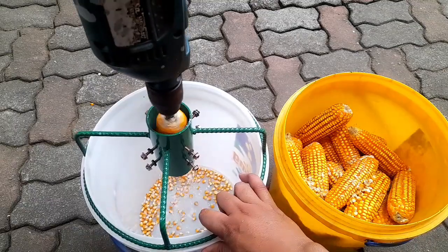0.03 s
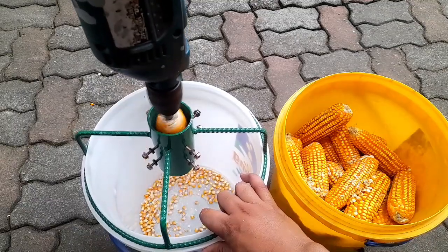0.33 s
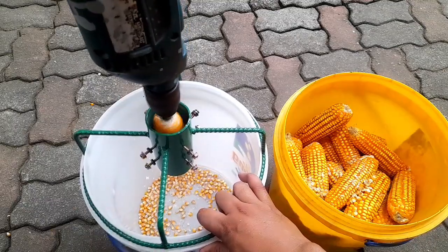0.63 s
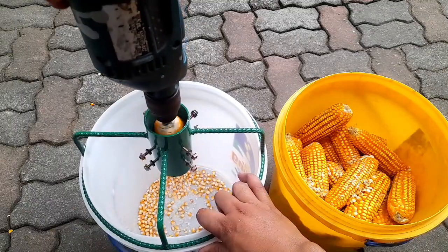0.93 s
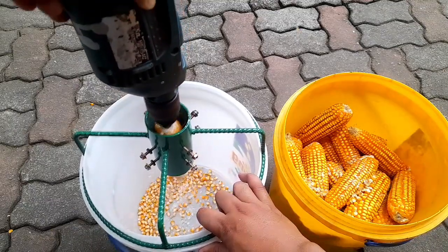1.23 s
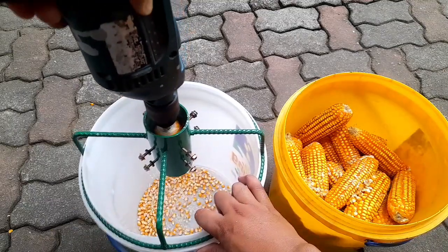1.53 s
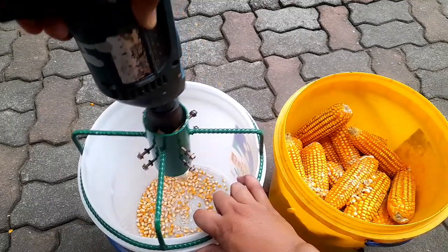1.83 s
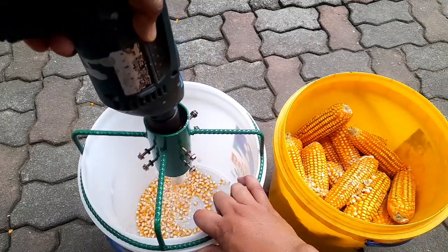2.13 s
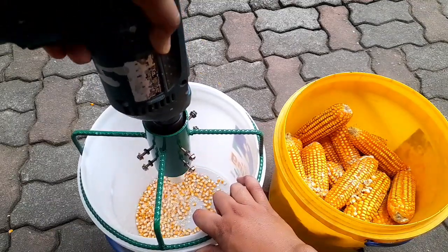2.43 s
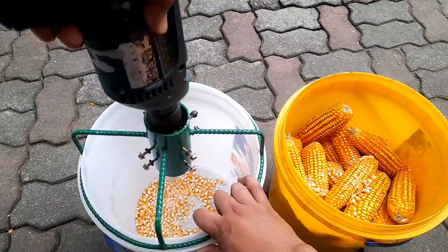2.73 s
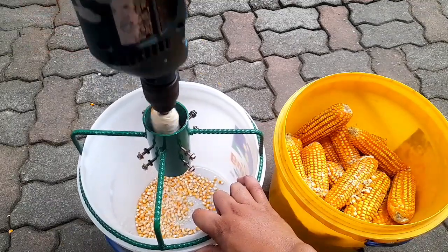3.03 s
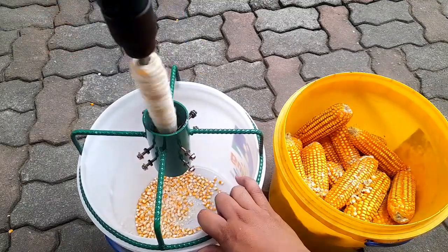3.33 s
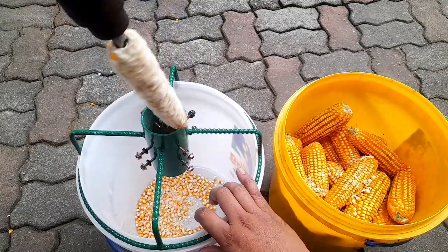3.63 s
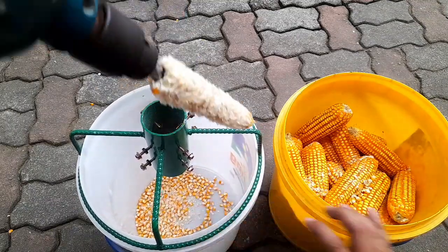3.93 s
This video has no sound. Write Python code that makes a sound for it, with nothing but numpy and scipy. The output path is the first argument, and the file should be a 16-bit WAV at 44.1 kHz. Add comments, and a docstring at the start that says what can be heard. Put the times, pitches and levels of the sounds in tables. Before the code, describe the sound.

A corn cob spun by a power drill grinds roughly in a steel pipe, close by outdoors. Kernels snap off and drum into a plastic bucket amid hollow knocks. Then the cob scrapes out and the drill winds down.

```python
"""Shelling corn with a power drill

Outdoors, a drill spins a corn cob through a toothed steel pipe over a plastic bucket. The teeth grind
and snap the kernels off, they drum into the bucket, and the cob judders with hollow knocks. After three
seconds the bare cob is drawn out, scraping and bumping, and the drill runs down with a falling whine.
Two microphones stand close by, the left one a little nearer the pipe."""
import sys
import numpy as np
from scipy import signal
from scipy.fft import rfft, irfft
from scipy.io import wavfile

SR = 44100
rng = np.random.default_rng(int(sys.argv[2]) if len(sys.argv) > 2 else 0)


def to_wav(sig):
    """Store sig (one row per channel, or 1-D mono) as 16-bit WAV at the path in sys.argv[1].

    Samples outside -1..1 are clipped; the rate is SR.
    """
    pcm = np.clip(np.atleast_2d(sig), -1, 1) * 32767
    pcm = np.round(pcm).astype(np.int16)
    wavfile.write(sys.argv[1], SR, pcm.T)  # frames by channels


N = 176400
T = np.arange(N) / SR
GRIND_END_S, USUAL_LOAD_DB = 3.154, -37

# How hard the cob is pressed into the teeth: time_s, load_db
COB_LOAD = [(0.0, -36.5), (0.08, -33.5), (0.18, -40), (0.38, -38), (0.45, -29), (0.59, -34), (0.64, -31.5),
            (0.84, -38), (0.91, -32.5), (0.93, -39), (1.16, -34), (1.66, -36.5), (1.81, -31.5), (1.92, -32),
            (2.11, -39), (2.46, -35), (2.66, -36.5), (2.81, -32.5), (3.2, -42.5)]
def cob_pressure(turns_per_s=9.6, wander=0.18):
    """The lopsided cob presses harder once in every uneven turn, on top of the slower load."""
    drift = np.interp(T, np.linspace(0, T[-1], 30), rng.standard_normal(30))
    turn = np.sin(2 * np.pi * np.cumsum(turns_per_s * (1 + wander * drift)) / SR)
    return turn, np.interp(T, *np.transpose(COB_LOAD))


# Resonances of the steel pipe: frequency_hz, gain_db
PIPE_SPECTRUM = [(440, -41), (750, -9), (857, -16.5), (947, -16), (1020, -8), (1120, -9), (1370, -10),
                 (1670, -3), (1850, -3), (1990, 1.5), (2180, -5), (2730, -3.5), (3120, -6), (3420, -13),
                 (3910, -9), (4730, -14), (5500, -23), (7150, -23.5), (12100, -120)]
# Dry kernels rubbing together: frequency_hz, gain_db
CRACKLE_SPECTRUM = [(2820, -20), (4800, -2), (5730, -6.5), (8060, -2.5), (10000, -5), (14600, -7),
                    (15500, -9), (16000, -14.5)]
def grinding(turn, load_db):
    """Teeth rasp over the kernels and ring the pipe; dry kernels crackle against each other."""
    rasp = colour(grains(per_s=1400, spread_db=1, decay_s=0.00065), PIPE_SPECTRUM)
    crackle = colour(grains(per_s=1100, spread_db=3, decay_s=0.0006), CRACKLE_SPECTRUM)
    rasp_db = load_db + 2.5 + 1.15 * turn
    crackle_db = -38.5 + 0.8 * (load_db - USUAL_LOAD_DB) + 0.2 * turn
    return fade(GRIND_END_S, db_per_s=57) * (rasp * amp(rasp_db) + crackle * amp(crackle_db))


# Kernels snapping off: start_s, level_db
SNAPS = [(0.1005, -20.5), (0.1437, -20), (0.176, -17.5), (0.1925, -20), (0.2058, -18), (0.223, -19),
         (0.2431, -16), (0.267, -16.5), (0.349, -18.5), (0.373, -17.5), (1.044, -25), (1.0844, -19.5),
         (1.106, -20.5), (1.1283, -20), (1.1472, -21), (1.1654, -18.5), (1.1847, -20.5), (1.298, -22.5),
         (1.376, -23.5), (1.4115, -25), (1.717, -20.5), (1.7655, -22), (2.167, -21.5), (2.2659, -20.5),
         (2.568, -27)]
# Their bright crack, close up: frequency_hz, gain_db
SNAP_SPECTRUM = [(300, -53), (1200, -6.5), (2300, 0), (5000, -1.5), (8500, -2.5), (12000, -4.5),
                 (16000, -7.5)]
def snaps(lag_s=0.0019):
    """Single kernels break away with a sharp crack."""
    events = [(start_s + lag_s, level_db) for start_s, level_db in SNAPS]
    return colour(bursts(events, rise_s=0.0001, decay_s=0.0016, tail_db=-6), SNAP_SPECTRUM)


# The plastic bucket under the pipe: frequency_hz, gain_db
BUCKET_SPECTRUM = [(40, -61), (70, -30), (128, -15), (256, -9.5), (296, -1.5), (371, -7.5), (423, -7),
                   (477, -1), (510, -2.5), (544, -10), (605, -10), (748, -14), (843, -21), (950, -20),
                   (1240, -38), (2090, -120)]
def pour(turn, load_db, thins_s=2.0, end_s=3.01):
    """A stream of kernels drums on the bucket and thins out as the cob leaves."""
    drops = unit(impacts(per_s=640, spread_db=1.5) * rng.choice([-1, 1], N))
    level_db = -37 + 0.76 * (load_db - USUAL_LOAD_DB) + 2.5 * turn
    level_db -= 1.5 * (T > thins_s)  # fewer kernels are left on the cob
    drops *= amp(level_db) * fade(end_s, db_per_s=35)
    wall = drops * rng.standard_normal(N) * amp(-15)  # opposite in sign at the two microphones
    return colour(np.array([drops + wall, drops - wall]), BUCKET_SPECTRUM)


# Hollow knocks of the juddering cob: time_s, level_db
KNOCKS = [(0.1, -16), (0.432, -12.5), (0.489, -14), (0.556, -13.5), (0.687, -14), (0.734, -17.5),
          (0.912, -14), (0.973, -17.5), (1.282, -11.5), (1.426, -18), (1.487, -13.5), (1.603, -16),
          (1.698, -16.5), (1.749, -17), (1.833, -13), (1.892, -17), (1.966, -16), (2.137, -21),
          (2.239, -19), (2.305, -17), (2.473, -6.5), (2.537, -19), (2.599, -17.5), (2.679, -15),
          (2.745, -18.5), (2.914, -26), (2.973, -17)]
# The modes each knock rings: pitch_hz, level_db, t60_s
KNOCK_MODES = [(294, -19, 0.041), (358, -15, 0.067), (425, -26, 0.11), (477.5, 2, 0.062), (701, -11, 0.048)]
def knocks(swell_s=0.0084, lead_s=0.00318, detune=0.022, gain_db=-1.5):
    """Hollow knocks swell briefly and ring near 480 Hz as the cob sticks and slips."""
    out, t = np.zeros((2, N)), np.arange(SR // 5) / SR
    swell = 1 - np.exp(-(t / swell_s) ** 2)
    for time_s, level_db in KNOCKS:
        ring = np.zeros_like(t)
        for pitch_hz, mode_db, t60_s in KNOCK_MODES:
            stray_db, stray_pitch, phase = rng.standard_normal(3)
            cycles = pitch_hz * (1 + detune * stray_pitch) * t + phase
            ring += amp(mode_db + stray_db - 60 * t / t60_s) * np.sin(2 * np.pi * cycles)
        add(out, time_s - lead_s, amp(level_db + gain_db) * swell * ring)
    return out


# The bare cob brushing the pipe: frequency_hz, gain_db
BRUSH_SPECTRUM = [(470, -39), (800, -25), (963, 0.5), (1140, -18), (1630, 7), (1810, 2), (1940, -6),
                  (3200, -6), (4160, -46), (7040, -120)]
# The cob catching on the teeth: start_s, level_db
CATCHES = [(1.8305, -16), (2.796, -13.5), (3.0168, -15), (3.0787, -28), (3.134, -20.5), (3.223, -23),
           (3.2707, -25), (3.2785, -19), (3.3086, -31), (3.3455, -24), (3.3634, -23), (3.5052, -20),
           (3.522, -27), (3.954, -39.5)]
# The scrape of each catch: frequency_hz, gain_db
SCRAPE_SPECTRUM = [(200, -22), (800, -4), (1700, 10), (3200, 2), (4500, 1), (7000, 1), (16000, -19)]
def cob_scrapes(free_s=3.49):
    """The cob catches on the teeth, mostly on its way out, when it brushes the pipe and comes free."""
    level = amp(-47.5) * unloading(over_s=0.12) * fade(free_s, db_per_s=155)
    brush = colour(grains(per_s=1700, spread_db=5, decay_s=0.00058), BRUSH_SPECTRUM)
    catches = colour(bursts(CATCHES, rise_s=0.00025, decay_s=0.0031, tail_db=-1.5), SCRAPE_SPECTRUM)
    return level * brush + amp(-9.5) * catches


# Hard kernels hitting the pipe: start_s, pitch_hz, level_db
PINGS = [(0.55, 4150, -27), (0.628, 2060, -23), (1.0234, 3720, -31), (2.5694, 4040, -26),
         (2.742, 4720, -24.5)]
def pings(rise_s=0.00067, decay_s=0.0067):
    """A kernel flung against the steel leaves a brief ring, in a different phase at each microphone."""
    out, t = np.zeros((2, N)), np.arange(SR // 10) / SR
    ring = (1 - np.exp(-t / rise_s)) * np.exp(-t / decay_s)
    for start_s, pitch_hz, level_db in PINGS:
        cycles = pitch_hz * t + 0.5 * rng.random((2, 1))
        add(out, start_s, amp(level_db) * ring * np.sin(2 * np.pi * cycles))
    return out


# The cob binding in the pipe: start_s, length_s, pitch_hz, level_db
GROANS = [(1.768, 0.12, 217, -38.5), (2.782, .1, 397.6, -34)]
def groans(sag_per_s=1.27):
    """The cob binds and judders, its pitch sagging as it drags on the drill."""
    out = np.zeros((2, N))
    for start_s, length_s, pitch_hz, level_db in GROANS:
        t = np.arange(0, length_s, 1 / SR)
        cycles = np.cumsum(pitch_hz * np.exp(-sag_per_s * t)) / SR
        add(out, start_s, amp(level_db) * np.sin(np.pi * t / length_s) * np.sin(2 * np.pi * cycles))
    return out * flutter(width_hz=84)


# Bumps on the bucket's rim: start_s, level_db
JOLTS = [(0.056, -39), (0.457, -35), (0.902, -40), (2.37, -29.5), (2.68, -29), (3.216, -35), (3.589, -37),
         (3.636, -43)]
# Their low thud: frequency_hz, gain_db
THUD_SPECTRUM = [(30, -56), (70, -30), (120, -9), (175, -9), (235, 3), (310, -7), (500, -22), (3000, -70)]
def jolts():
    """The cob jolts the frame, which thuds dully on the bucket."""
    return amp(1.5) * colour(bursts(JOLTS, rise_s=0.0028, decay_s=0.016, tail_db=-6.5), THUD_SPECTRUM)


# The drill's brushes and gears: frequency_hz, gain_db
MOTOR_SPECTRUM = [(500, -27), (1000, -5.5), (1300, -5.5), (2400, -4.5), (3000, -8), (4100, -8), (4550, 2),
                  (5100, -7), (6600, -3.5), (10000, -7.5), (13000, -8.5), (16000, -18)]
def motor(slows_s=3.674, loaded_db=-7.5):
    """The drill fizzes, louder once it runs free; fizz and whine die away as it stops."""
    level_db = -41.5 + loaded_db * (1 - unloading(over_s=0.099))
    fizz = colour(grains(per_s=2300, spread_db=4.5, decay_s=0.0002), MOTOR_SPECTRUM)
    return fade(slows_s, db_per_s=90) * (amp(level_db) * fizz + whine())


# Partials of the motor's whine: harmonic, level_db
WHINE_PARTIALS = [(2, -52), (3, -58)]
def whine(coast_s=3.5, fundamental_hz=2500, spin_down_s=0.358):
    """The released motor coasts down with a falling whine."""
    since_s = np.maximum(T - coast_s, 0)
    cycles = np.cumsum(fundamental_hz * np.exp(-since_s / spin_down_s)) / SR
    level = np.minimum(since_s / 0.1, 1) * fade(coast_s, db_per_s=62)
    return level * sum(amp(level_db) * flutter(width_hz=160) * np.sin(2 * np.pi * harmonic * cycles)
                       for harmonic, level_db in WHINE_PARTIALS)


# The open air, heard beside the bucket: frequency_hz, gain_db
BACKGROUND_SPECTRUM = [(30, -62), (136, -10.5), (253, -11.5), (292, -1.5), (320, -17.5), (364, -6),
                       (394, -13), (511, -9), (567, -17), (6530, -38.5), (15000, -52)]
def background():
    """Faint outdoor background with the bucket's low, hollow resonance."""
    return amp(-54) * colour(noise_pair(), BACKGROUND_SPECTRUM)


def amp(db):
    """Decibels to gain."""
    return 10 ** (np.asarray(db) / 20)


def unit(x):
    """Scales to an rms of 1."""
    return x / np.sqrt(np.mean(x ** 2) + 1e-20)


def fade(start_s, db_per_s):
    """A gain of 1 that dies away from start_s on."""
    return amp(-db_per_s * np.maximum(T - start_s, 0))


def unloading(over_s):
    """Rises from 0 to 1 over the last moments of grinding."""
    return np.clip((T - GRIND_END_S) / over_s + 1, 0, 1)


def flutter(width_hz, depth=0.76):
    """A gain that wavers at random around 1."""
    return 1 + depth * unit(smear(smear(rng.standard_normal(N), 1 / width_hz), 1 / width_hz))


def add(mix, start_s, sound):
    """Mixes a sound in at start_s."""
    part = mix[:, max(round(start_s * SR), 0):][:, :sound.shape[-1]]
    part += sound[..., :part.shape[1]]


def colour(x, spectrum):
    """Causal filter of unit energy with the given spectral shape."""
    hz, db = np.transpose(spectrum)
    bins_hz = abs(np.fft.fftfreq(4096, 1 / SR))
    gain_db = np.maximum(np.interp(np.log(bins_hz + 1), np.log(hz + 1), db), -100)
    minimum_phase = np.exp(np.conj(signal.hilbert(np.log(amp(gain_db)))))
    taps = np.fft.ifft(minimum_phase).real
    return signal.oaconvolve(x, taps[None] / np.linalg.norm(taps), axes=1)[:, :x.shape[1]]


def impacts(per_s, spread_db):
    """Random impacts, many small and a few large."""
    return (rng.random(N) < per_s / SR) * amp(spread_db * np.minimum(rng.exponential(1, N), 4.5))


def grains(per_s, spread_db, decay_s):
    """Each impact is a tiny burst that swells and dies within a few decay_s."""
    power = smear(smear(impacts(per_s, spread_db) ** 2, decay_s), decay_s)
    return unit(scattered(power, tail_db=-1.5))


def bursts(events, rise_s, decay_s, tail_db):
    """One decaying burst of noise for each event."""
    level, t = np.zeros((1, N)), np.arange(SR // 5) / SR
    for start_s, level_db in events:
        add(level, start_s, amp(level_db) * (1 - np.exp(-t / rise_s)) * np.exp(-t / decay_s))
    return scattered(level ** 2, tail_db)


def smear(power, decay_s):
    """Spreads power over an exponential decay."""
    keep = np.exp(-2 / (decay_s * SR))
    return signal.lfilter([1 - keep], [1, -keep], power)


def scattered(power, tail_db):
    """Noise of the given power, with a short tail from the bucket's wall and the paving."""
    return np.sqrt(power + amp(tail_db) ** 2 * smear(power, decay_s=0.013)) * noise_pair()


def noise_pair(wide_hz=2120, left_lead_s=0.0001):
    """White noise for two microphones, the left one nearer: alike in the bass, unrelated in the treble."""
    left, unrelated = rfft(rng.standard_normal((2, N)))
    hz = np.fft.rfftfreq(N, 1 / SR)
    coherence = 1 / (1 + (hz / wide_hz) ** 3)
    delay = np.exp(-2j * np.pi * hz * left_lead_s)
    right = coherence * left * delay + np.sqrt(1 - coherence ** 2) * unrelated
    return irfft(np.array([left, right]), N)


def scene():
    """Pipe slightly to the left, the bucket below it, quiet open air around."""
    turn, load_db = cob_pressure()
    pipe = grinding(turn, load_db) + snaps() + pings() + cob_scrapes() + motor()
    lean_left = amp([[0.8], [-0.8]])
    return pipe * lean_left + pour(turn, load_db) + knocks() + groans() + jolts() + background()


def record(dry, cutoff_hz=15800):
    """The recorder's band limit."""
    lowpass = signal.firwin(511, cutoff_hz, window=("kaiser", 9), fs=SR)
    return signal.oaconvolve(dry, lowpass[None], "same")


dry = scene()
out = record(dry)
to_wav(out)
```